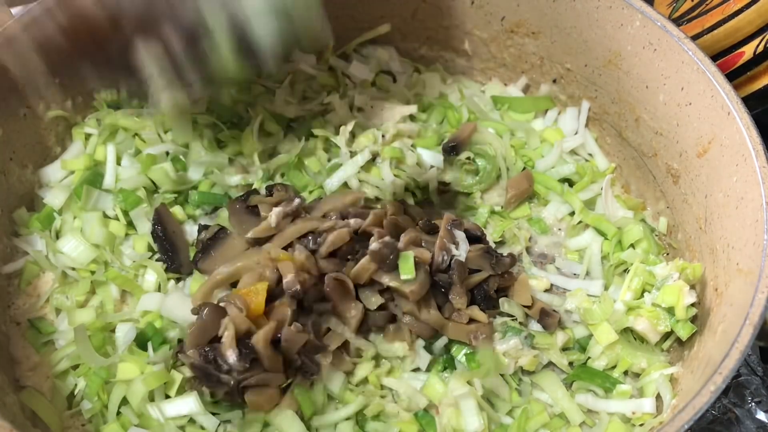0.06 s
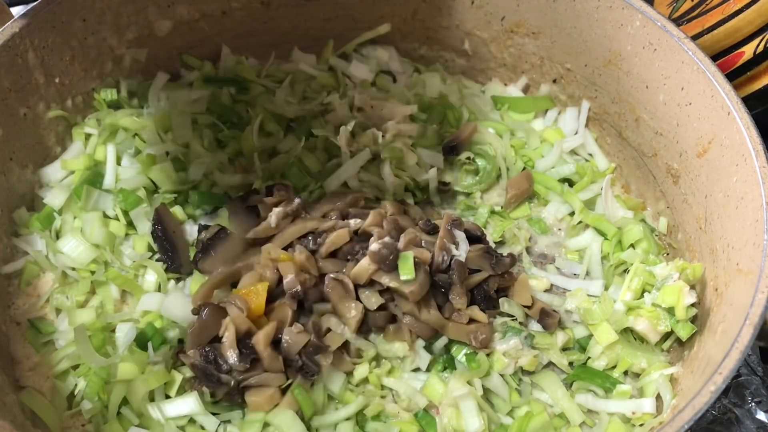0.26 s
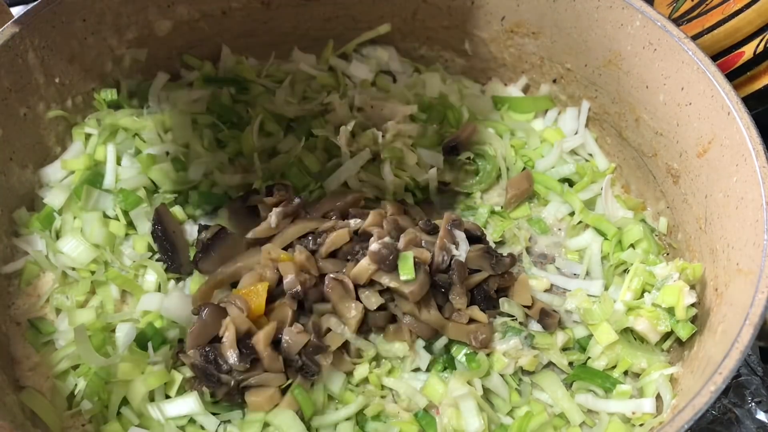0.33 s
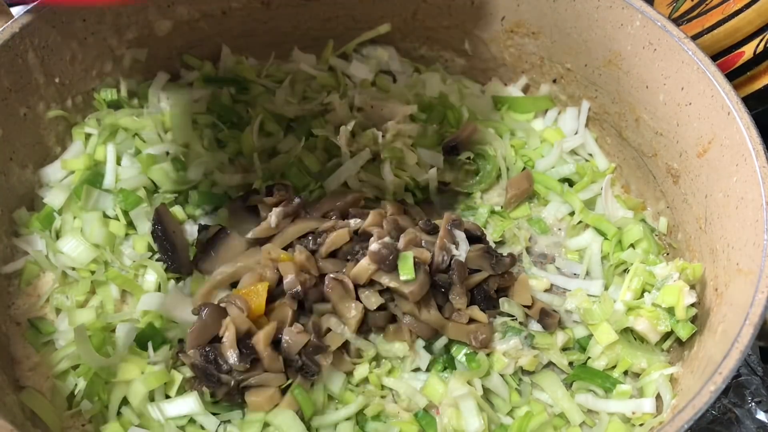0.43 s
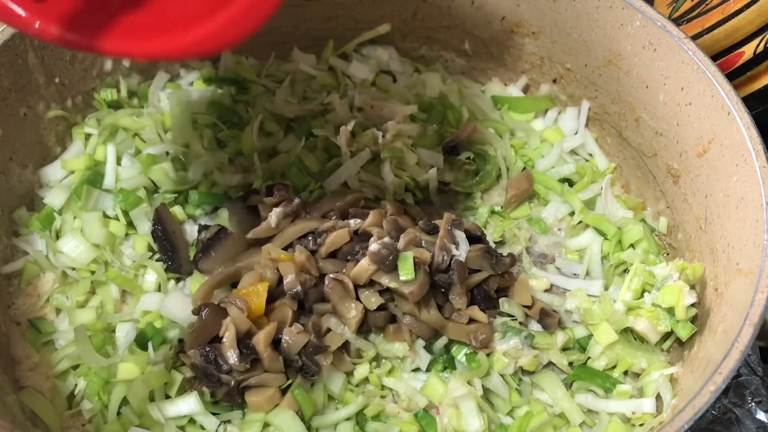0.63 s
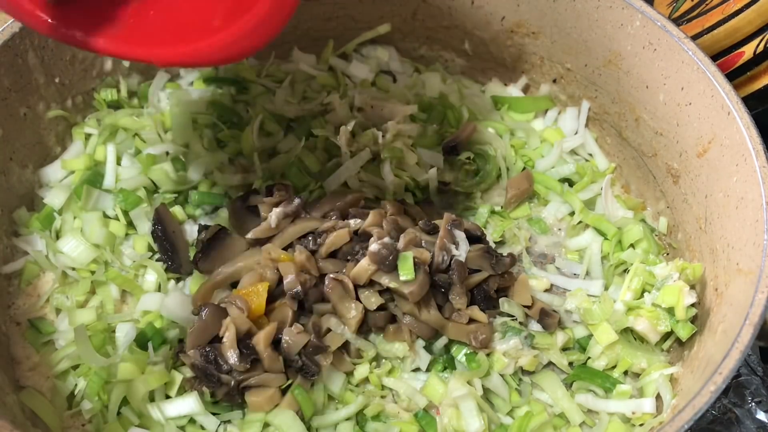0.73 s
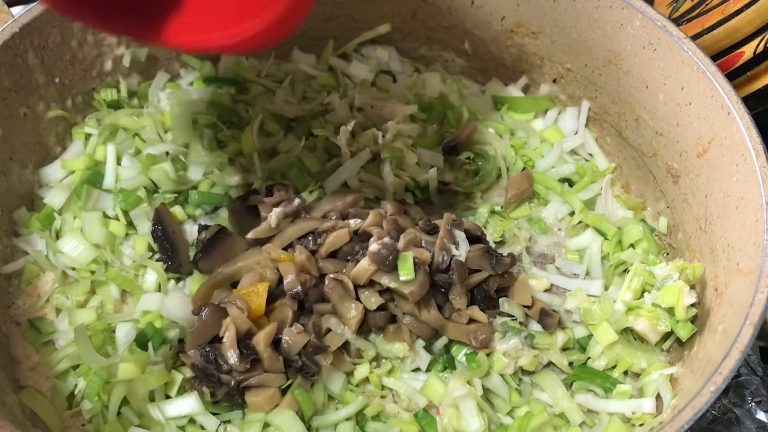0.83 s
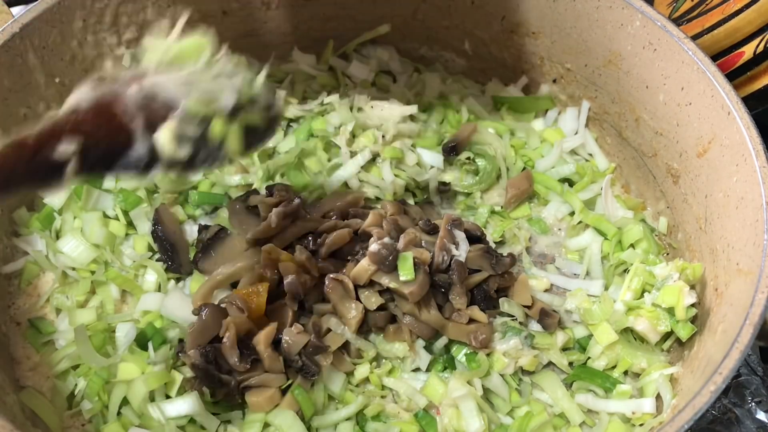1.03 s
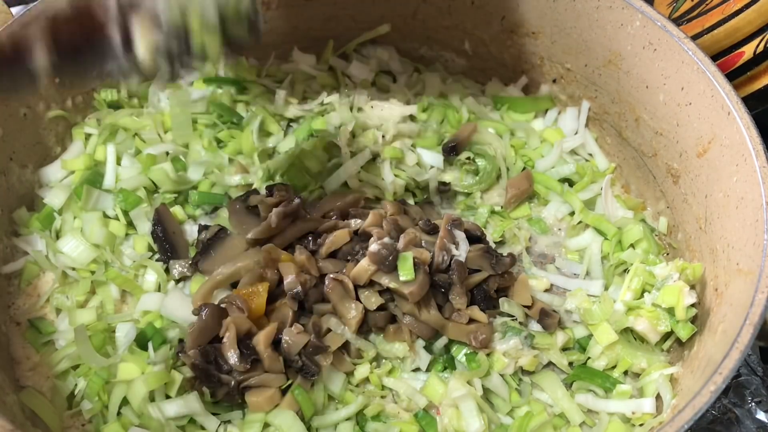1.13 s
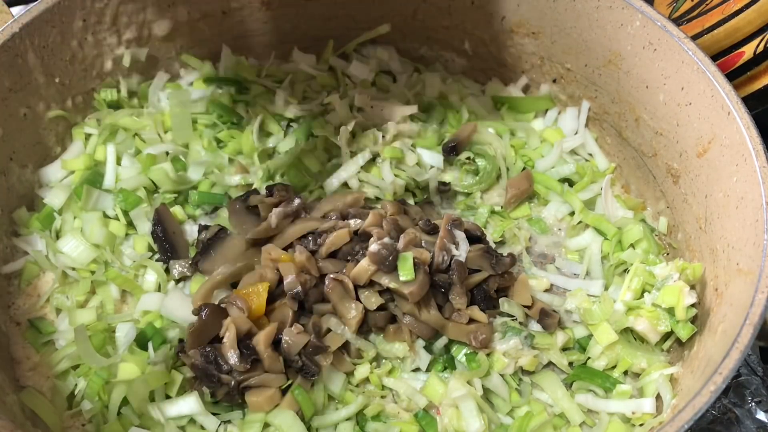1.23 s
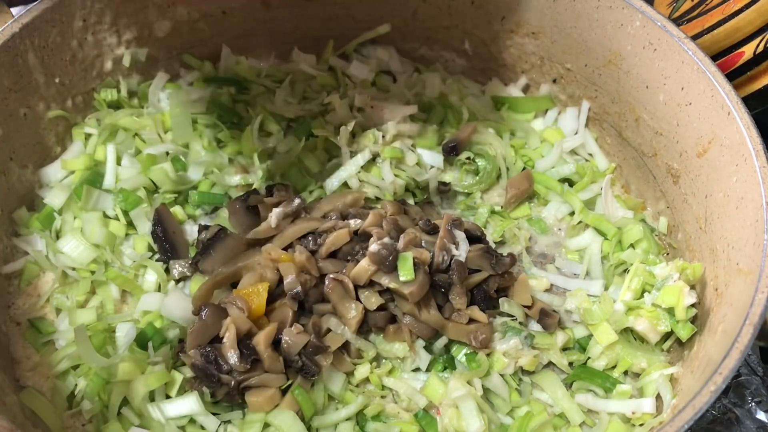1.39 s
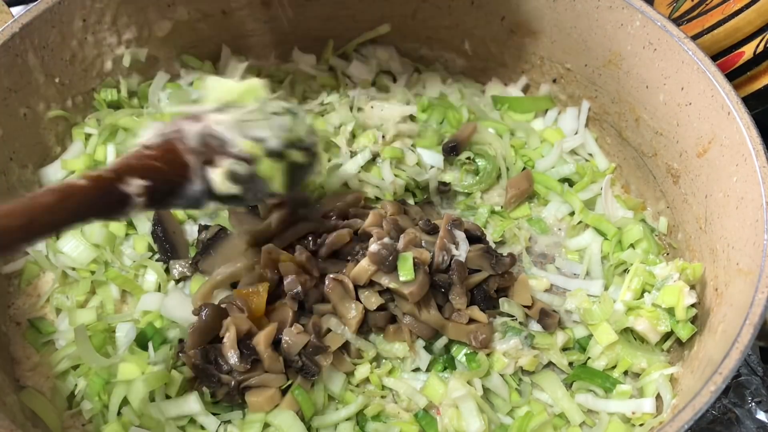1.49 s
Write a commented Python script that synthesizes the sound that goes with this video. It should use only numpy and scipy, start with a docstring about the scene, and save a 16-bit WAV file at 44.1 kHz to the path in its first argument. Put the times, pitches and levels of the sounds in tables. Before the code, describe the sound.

Two dull wooden spoon knocks against a pan of softly sizzling vegetables.

```python
"""Two dull knocks of a wooden spoon on a heavy pan full of vegetables, with one light touch between.
Each knock rings the pan briefly, damped by the food, and a home kitchen answers.
The vegetables sizzle faintly: tiny bubbles burst, steam hisses and a few droplets of fat snap.
Behind them a small motor, probably a fan, hums and whines over a low rumble of moving air."""
import sys
import numpy as np
from scipy import signal
from scipy.fft import rfft, irfft, next_fast_len
from scipy.io import wavfile
from scipy.ndimage import map_coordinates

SR = 44100
rng = np.random.default_rng(int(sys.argv[2]) if len(sys.argv) > 2 else 0)


def bounce(signal):
    """Save signal as a 16-bit WAV file at the path given by the first command-line argument."""
    frames = np.transpose(np.atleast_2d(signal))
    limited = np.clip(frames, -1, 1)
    pcm = np.round(limited * 32767).astype(np.int16)
    wavfile.write(sys.argv[1], SR, pcm)


N = 68355

# early reflections off the hob and walls: delay_s, level_db
REFLECTIONS = [(.0035, -13), (.0081, -19.5), (.0137, -24), (0.0203, -24), (0.028, -29), (.0445, -30),
               (.075, -32)]


def spoon_knocks():
    """Each knock cracks on contact and rings the food-damped pan briefly; the near walls answer."""
    # spoon on pan: start_s, level_db, treble_tilt_db_per_octave, crack_db, body_boost_db
    knocks = [(0.2236, -7, 2, -26, 8.5), (.5885, -32, -20, -13, -4), (1.2633, -6.5, -0.53, -31, -9.5)]
    # ringing modes of spoon and pan: pitch_hz, level_db, t60_s
    pan_modes = [(160, -22, 0.049), (266.6, -21.5, 0.042), (564.4, -9.5, 0.052), (856, -24.5, 0.061),
                 (950.5, -19.5, 0.072), (1061.6, -5, 0.035), (1145, -1, 0.025), (1216, -23, 0.06),
                 (1890, -20, 0.024), (2534, -18.5, 0.013), (4305, -28.5, 0.0095), (5284, -35.5, 0.016),
                 (6490, -30.5, 0.009)]
    # tone of the contact crack: frequency_hz, level_db
    crack_eq = [(300, 10.5), (2500, 0), (7000, -6), (15000, -15.5)]
    press_s, crack_t60_s = 0.00083, 0.018  # the wood takes a moment to press home
    tilt_above_hz, body_hz, body_width_hz = 930, 800, 145
    out, t = np.zeros(N), np.arange(SR // 2) / SR
    hz, mode_db, t60 = np.transpose(pan_modes)[..., None]
    attack = 1 - np.exp(-(t / press_s) ** 2)
    treble_octaves = np.log2(np.maximum(hz / tilt_above_hz, 1))
    # these modes ring more or less, depending on where the spoon lands
    body_band = np.exp(-((hz - body_hz) / body_width_hz) ** 2)
    for start_s, level_db, tilt, crack_db, body_db in knocks:
        strike_db = tilt * treble_octaves + body_db * body_band
        modes = amp(mode_db + strike_db - 60 * t / t60) * np.sin(2 * np.pi * hz * t)
        ring = modes.sum(axis=0) * attack
        crack = unit(coloured(rng.standard_normal(len(t)), crack_eq))
        crack *= amp(crack_db - 60 * t / crack_t60_s)
        knock = amp(level_db) * (ring + crack)
        add(out, start_s, kitchen_reverb(knock))
        for delay_s, wall_db in REFLECTIONS:
            add(out, start_s + delay_s, amp(wall_db) * knock)
    low_cut = signal.butter(2, 110, "high", fs=SR, output="sos")
    return signal.sosfilt(low_cut, out)


def sizzle():
    """Many tiny bubbles burst in the fat, and now and then a larger droplet snaps."""
    # snapping droplets: start_s, peak_db
    snaps = [(.110, -38), (.2598, -37), (0.341, -43), (.4023, -40), (0.4273, -27.5), (0.5898, -33.5),
             (0.6692, -47), (.7665, -41), (.950, -47)]
    # bright tone of bubbles and droplets: frequency_hz, level_db
    fat_eq = [(500, -26), (2800, -12), (4500, -4.5), (6800, -3.5), (9500, -7), (12500, -6.5), (16000, -11)]
    bubbles_per_s, bed_db, spread_db = 660, -67, 5
    spray_gain, spray_t60_s = 0.23, 0.0074
    t = np.arange(SR // 50) / SR
    bubbles = (rng.random(N) < bubbles_per_s / SR) * rng.choice([-1, 1], N)
    bubbles = bubbles * amp(spread_db * rng.standard_normal(N))
    out = amp(bed_db) * unit(coloured(bubbles, fat_eq))
    click = t == 0
    for start_s, peak_db in snaps:
        spray = spray_gain * rng.standard_normal(len(t)) * amp(-60 * t / spray_t60_s)
        snap = coloured(click + spray, fat_eq)
        add(out, start_s, amp(peak_db) * snap / np.abs(snap).max())
    return kitchen_reverb(out)


def steam():
    """Soft, flickering hiss of the vegetables giving off their water."""
    # swell of the hiss: time_s, level_db
    swell = [(0, -61.5), (.35, -60), (.55, -59), (.75, -60), (1.1, -58), (1.3, -58), (1.42, -58.5),
             (1.55, -57)]
    # tone of the hiss: frequency_hz, level_db
    hiss_eq = [(2000, -3), (3300, -4), (4300, 0), (5300, -7), (8000, -10.5), (10300, -11.5), (12500, -11),
               (16000, -19.5)]
    hiss_db, = curves(swell)
    return noise(hiss_eq) * amp(hiss_db + 1.2 * wobble(per_s=18))


def motor():
    """Overtones of a drifting shaft: a soft hum, and a thin, rough whine that flutters once a turn."""
    # shaft speed: time_s, turns_per_s
    shaft_speed = [(0, 73.9), (.3, 75), (.45, 75.3), (.6, 75.4), (.8, 75.8), (1.15, 75.6), (1.4, 75.9),
                   (1.55, 76.4)]
    # swell of the hum, the 8th overtone: time_s, level_db
    hum_swell = [(0, -66), (.7, -61), (1.0, -62), (1.5, -71)]
    # the whine's two strongest overtones: time_s, level_28th_db, level_29th_db
    whine_swell = [(0, -57, -77), (.15, -66.5, -69), (.3, -68, -52.5), (.45, -65.5, -54), (.68, -57.5, -63),
                   (.84, -54.5, -91), (1.0, -59.5, -63.5), (1.1, -65, -55.5), (1.22, -71.5, -61),
                   (1.38, -56.5, -55), (1.55, -55, -60)]
    # fainter overtones: multiple_of_speed, level_db
    overtones = [(2, -63), (3, -66.5), (13, -69), (23, -71.5), (26, -69.5), (27, -66), (30, -70.5),
                 (31, -70), (32, -81), (38, -73.5), (39, -74)]
    jitter_hz, stray_rad, roughness = 0.062, 0.61, 0.26
    waver_db, waver_per_s = 2.5, 8.92
    speed, = curves(shaft_speed)
    angle = 2 * np.pi * np.cumsum(speed + jitter_hz * wobble(per_s=25.5)) / SR

    def tone(order):
        """One overtone of rms 1, its phase straying from the shaft's."""
        return np.sqrt(2) * np.sin(order * angle + stray_rad * wobble(waver_per_s))

    hum_db, = curves(hum_swell)
    lower_db, upper_db = curves(whine_swell)
    whine = amp(lower_db) * tone(order=28) + amp(upper_db) * tone(order=29)
    faint = sum(amp(db + waver_db * wobble(waver_per_s)) * tone(order) for order, db in overtones)
    hum = amp(hum_db) * tone(order=8)
    flicker = 1 + roughness * wobble(per_s=90)
    return hum + (whine + faint) * flicker


def air_rumble():
    """A low bed of moving air, wavering slightly in level."""
    # tone of the rumble: frequency_hz, level_db
    rumble_eq = [(20, -51), (40, -15), (60, 8.5), (95, -8), (145, 1.5), (185, -11.5), (240, -2), (330, -17),
                 (450, -19), (600, -12.5), (760, -18), (1020, -12.5), (1350, -17.5), (2050, -11),
                 (2550, -20), (3000, -22), (3600, -29.5), (8000, -79)]
    level_db, waver_db = -50, 1.88
    return noise(rumble_eq) * amp(level_db + waver_db * wobble(per_s=9.62))


def kitchen_reverb(x):
    """The sound plus a short, diffuse room tail that starts with the first reflection."""
    # decay of the room: frequency_hz, t60_s
    decay = [(150, 0.19), (1200, 0.26), (4000, 0.19), (12000, 0.098)]
    # tone of the tail: frequency_hz, level_db
    tail_eq = [(200, 3.5), (600, -9), (900, -5.5), (1300, -4), (1550, 4), (1850, 7), (2600, 0), (6000, -2)]
    send_db, predelay_s = -13, REFLECTIONS[0][0]
    hz, t, bands = signal.stft(rng.standard_normal(SR // 2), SR, nperseg=256)
    _, tail = signal.istft(bands * amp(-60 * t / along(decay, hz)[:, None]), SR, nperseg=256)
    tail = coloured(tail / np.linalg.norm(tail), tail_eq)
    tail = np.pad(tail, (round(predelay_s * SR), 0))
    return x + amp(send_db) * signal.fftconvolve(x, tail)[:len(x)]


def amp(db):
    """Decibels to gain."""
    return 10 ** (np.asarray(db) / 20)


def unit(x):
    """Scale to rms 1."""
    return x / np.sqrt(np.mean(x ** 2) + 1e-20)


def along(points, hz):
    """Read (frequency_hz, value) points at hz, on a log frequency axis."""
    point_hz, values = np.transpose(points)
    return np.interp(np.log(hz + 1), np.log(point_hz + 1), values)


def curves(rows):
    """An automation curve, one value per sample, for each column after the time."""
    time_s, *columns = np.transpose(rows)
    return [np.interp(np.arange(N) / SR, time_s, column) for column in columns]


def wobble(per_s):
    """A smooth random curve through per_s points a second."""
    return map_coordinates(rng.standard_normal(256), [np.arange(N) * per_s / SR], mode="wrap")


def coloured(x, eq, size=2048):
    """x through a minimum-phase EQ, so nothing rings ahead of an attack."""
    cepstrum = irfft(np.log(amp(along(eq, np.fft.rfftfreq(size, 1 / SR)))))
    cepstrum[1:size // 2] *= 2
    cepstrum[size // 2 + 1:] = 0
    impulse = irfft(np.exp(rfft(cepstrum)))
    return signal.fftconvolve(x, impulse)[:len(x)]


def noise(eq):
    """Noise of rms 1, shaped by the EQ curve."""
    white = rfft(rng.standard_normal(2 * N))
    gain = amp(along(eq, np.fft.rfftfreq(2 * N, 1 / SR)))
    return unit(irfft(white * gain)[:N])


def add(track, start_s, sound):
    """Mix a sound into the track at start_s."""
    part = track[round(start_s * SR):][:len(sound)]
    part += sound[:len(part)]


def scene():
    """The mono mix, as heard just above the pan."""
    return (spoon_knocks() + sizzle() + steam() + motor() + air_rumble())[None]


def record(dry):
    """A brick-wall high cut takes off the very top of the treble."""
    top_hz = 16000
    size = next_fast_len(N + SR // 2)
    passband = np.fft.rfftfreq(size, 1 / SR) < top_hz
    return irfft(rfft(dry, size) * passband, size)[..., :N]


dry = scene()
out = record(dry)
bounce(out)
```